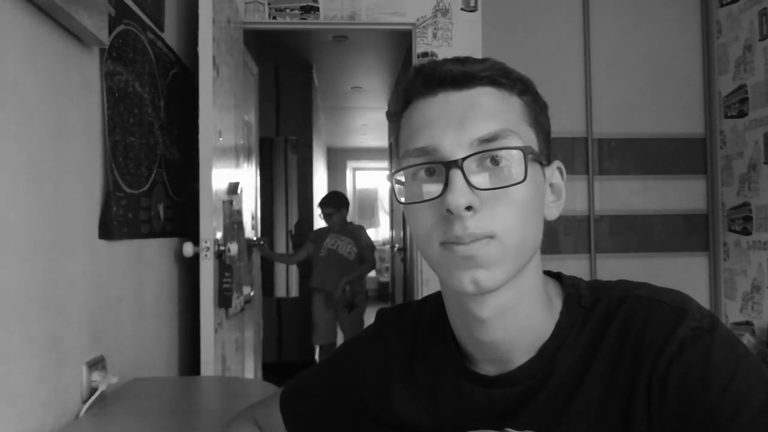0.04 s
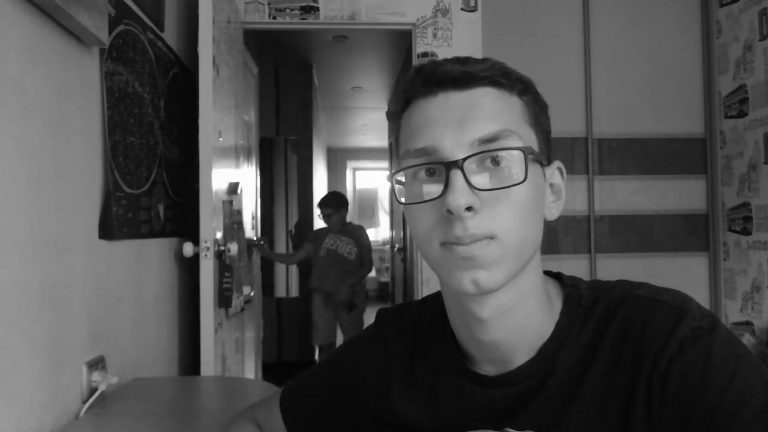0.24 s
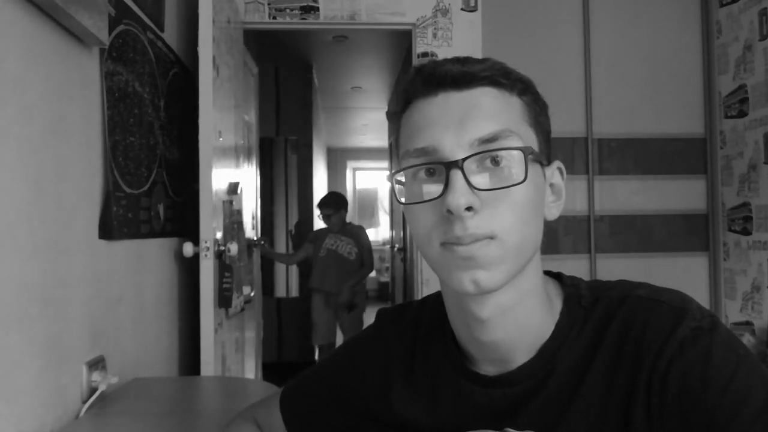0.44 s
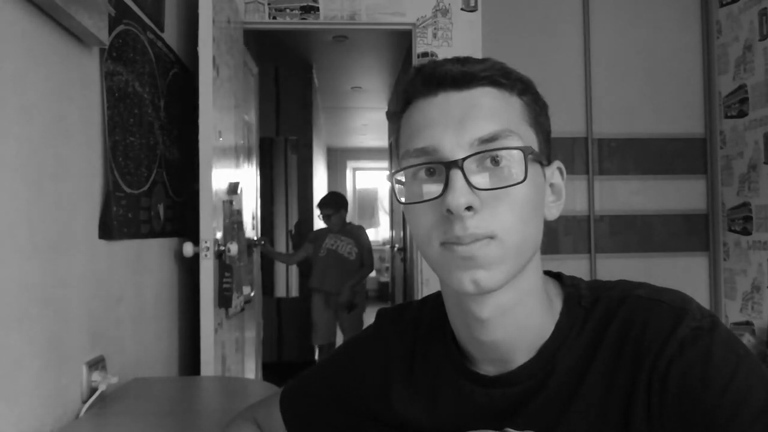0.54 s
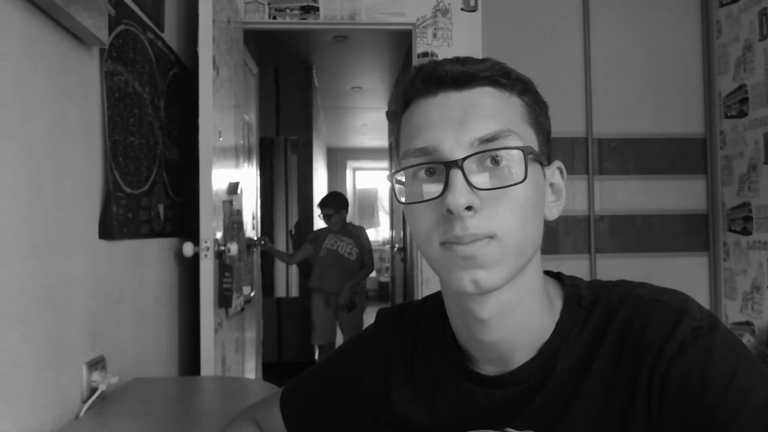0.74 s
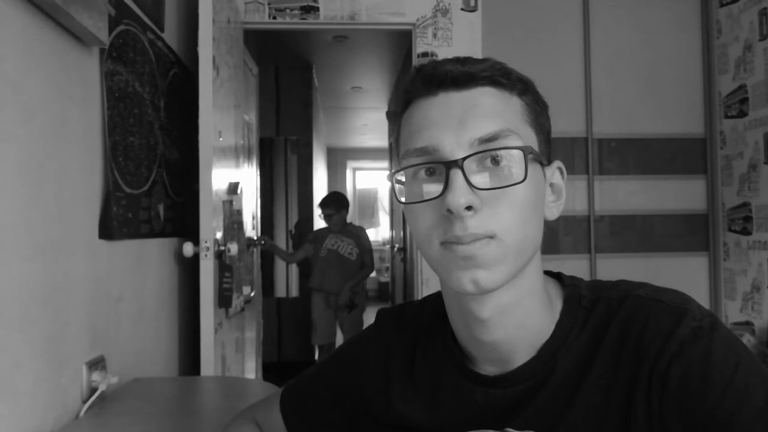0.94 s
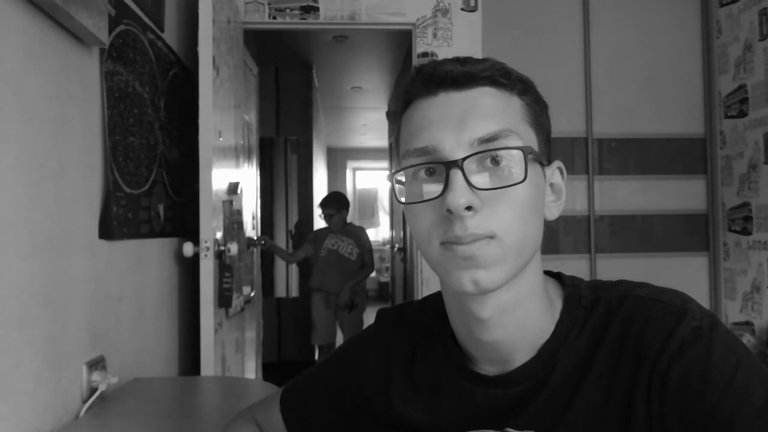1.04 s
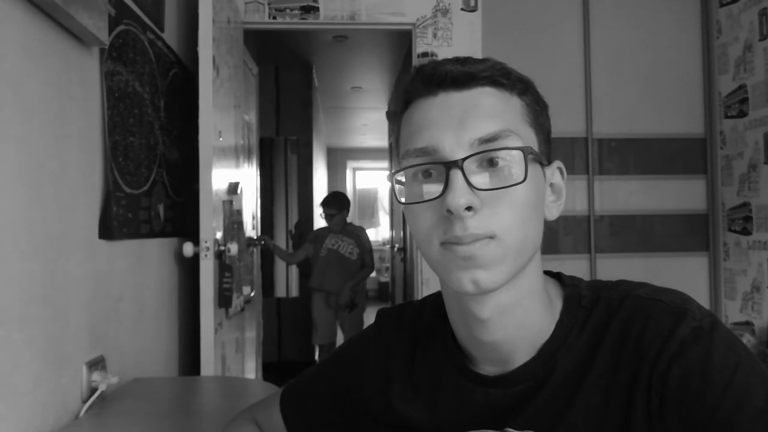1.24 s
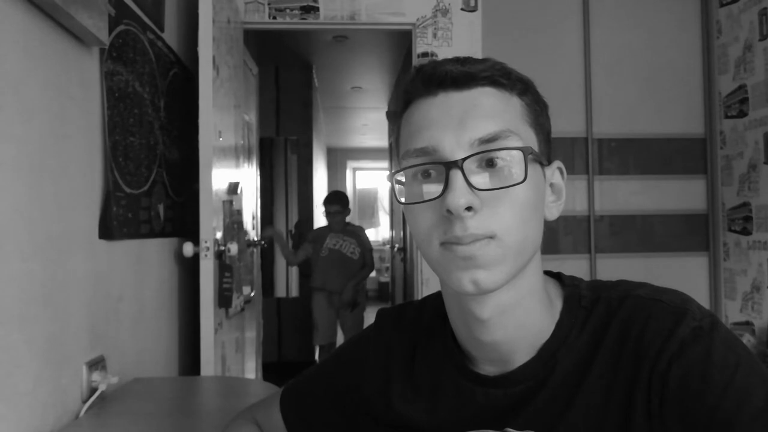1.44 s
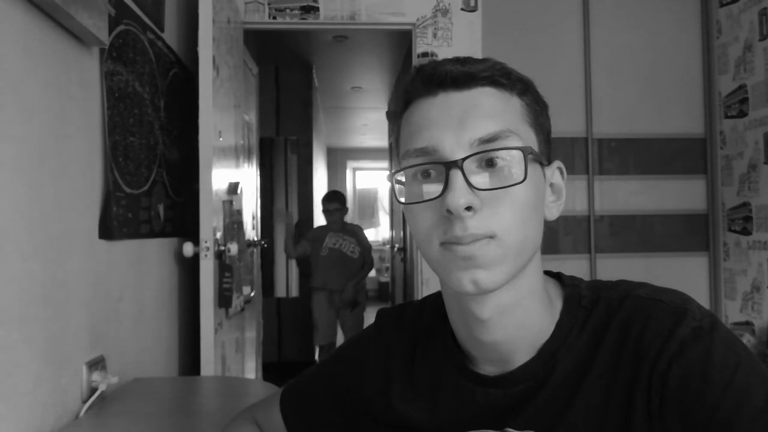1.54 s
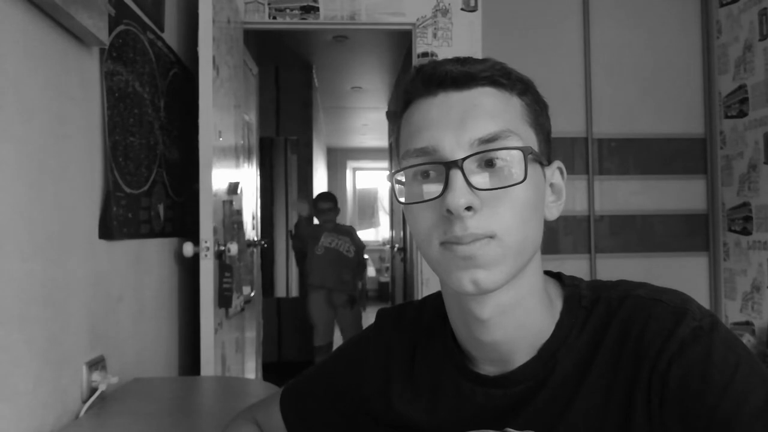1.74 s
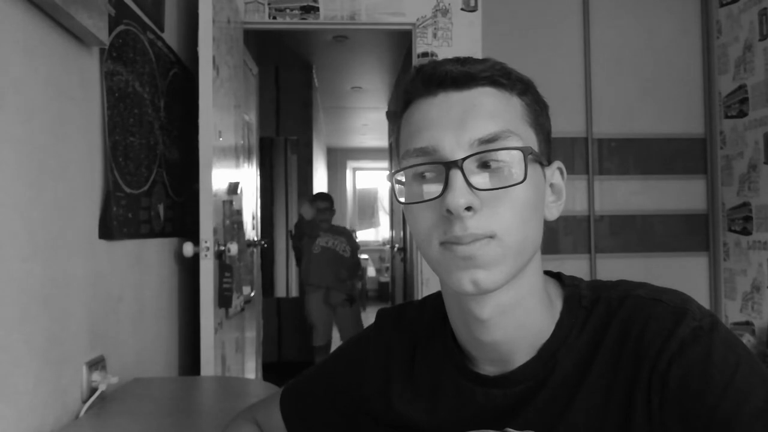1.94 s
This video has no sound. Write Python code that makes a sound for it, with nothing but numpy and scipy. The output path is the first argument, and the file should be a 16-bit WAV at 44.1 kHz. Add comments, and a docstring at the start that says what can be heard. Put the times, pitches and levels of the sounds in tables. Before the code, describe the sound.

In a small room, an inner door swings with a short, high squeak and stops with a deep, rattling thud. A few faint handling taps and scuffs come afterwards, over a steady low electrical hum.

```python
"""A dry hinge rasps, then locks into a rising squeal as its stick-slip friction turns regular.
The inner door meets its stop with a thud and a rattle, rebounds softly and sets the air of the
rooms swaying; each impact excites damped modes of door and room. A few faint scuffs and taps
of handling follow, in a small room with a low mains hum."""
import sys
import numpy as np
from scipy import signal
from scipy.fft import rfft, irfft
from scipy.io import wavfile

SR = 44100
rng = np.random.default_rng(int(sys.argv[2]) if len(sys.argv) > 2 else 0)


def wrap_up_sound(samples):
    """Save the sound to the file named by the first command line argument, as 16-bit audio."""
    columns = np.atleast_2d(samples).T
    # keep every value between -1 and 1, then stretch to whole-number steps
    tamed = np.clip(columns, -1, 1)
    steps = np.round(tamed * 32767).astype(np.int16)
    wavfile.write(sys.argv[1], SR, steps)


N = 88200
T = np.arange(N) / SR

# impacts of the door on its stop (time [s], boom [dB], knock [dB], rattle [dB])
DOOR_IMPACTS = [(0.212, -43, -37, -75), (0.2196, -32.5, -35, -44.5), (0.239, -30.5, -39.5, -49),
                (.279, -39, -48.5, -64.5), (.322, -37.5, -59, -83), (.352, -40, -60, -89.5)]


def undb(db):
    """Amplitude ratio of a level in decibels."""
    return 10 ** (np.asarray(db) / 20)


def unit(x):
    """Normalisation to rms 1."""
    return x / np.sqrt(np.mean(x ** 2))


def noise(spectrum):
    """Filtered white noise of rms 1: follows (frequency [Hz], level [dB]) from 15 Hz to 8 kHz."""
    hz, db = np.array(spectrum, float).T
    f = np.arange(N // 2 + 1) * SR / N + 1e-3
    gain = undb(np.interp(np.log(f), np.log(hz), db)) / (1 + (15 / f) ** 4) * (f < 8000)
    return unit(irfft(rfft(rng.standard_normal(N)) * gain, N))


def wander(rate_hz, size=N):
    """Low-pass random fluctuation of rms 1."""
    f = np.arange(size // 2 + 1) * SR / size
    return unit(irfft(rfft(rng.standard_normal(size)) * np.exp(-(f / rate_hz) ** 2), size))


def strike(start, attack, t60):
    """Envelope of a damped vibration: linear rise, then exponential decay by 60 dB in t60 seconds."""
    age = T - start
    return np.clip(age / attack, 0, 1) * np.exp(-np.log(1000) * np.maximum(age - attack, 0) / t60)


def reverberate(x, wet_db):
    """Reverberation: a small room's diffuse reflections share the power with the direct sound."""
    tail = rng.standard_normal(N) * strike(0.0071, 0.0031, t60=.38)
    wet = signal.fftconvolve(x, tail / np.sqrt(np.sum(tail ** 2)))[:len(x)]
    return (x + undb(wet_db) * wet) / np.sqrt(1 + undb(wet_db) ** 2)


def background():
    """Line spectrum over broadband noise: mains and appliance hum wavers above steady room tone."""
    # room tone (frequency [Hz], relative level [dB])
    room_spectrum = [(20, 4), (50, 2.5), (85, -7), (150, -6.5), (260, -8.5), (430, -17), (750, -20),
                     (1050, -23), (1420, -29), (2000, -29), (3200, -31), (3850, -40), (4800, -35),
                     (5700, -32), (7300, -42)]
    # hum partials (frequency [Hz], rms level [dB], waver [dB])
    hum_partials = [(59.5, -63.5, 1), (119.5, -61, 1.5), (167, -72, 2), (249, -73, 2), (758, -85, 1),
                    (1008, -84, 1), (2019, -89, 1)]
    waver_hz, drift_rad = 2.4, .6
    out = undb(-60) * noise(room_spectrum)
    for hz, db, waver_db in hum_partials:
        phase = 2 * np.pi * (hz * T + rng.random()) + drift_rad * wander(waver_hz)
        out += np.sqrt(2) * undb(db + waver_db * wander(waver_hz)) * np.sin(phase)
    return out


def handling():
    """Transient excitation: soft scuffs and taps, each a decaying noise burst with a woody resonance."""
    # contacts (time [s], attack [s], low [dB], middle [dB], high [dB], ring frequency [Hz])
    taps = [(.655, 0.037, -67, -65.5, -96, 877), (0.908, 0.026, -65.5, -94, -79, 688),
            (0.936, 0.015, -86, -95, -73, 1146), (1.234, 0.011, -61, -70, -60, 1140),
            (1.405, 0.022, -73, -75, -77.5, 1160), (1.469, 0.02, -78, -83, -76.5, 1130),
            (1.801, 0.012, -74, -73.5, -71.5, 1140)]
    # their three noise bands (frequency [Hz], relative level [dB])
    low_band = [(200, -7), (480, -8), (680, 0), (1150, -10.5), (1400, -12), (1900, -17.5), (3000, -32)]
    middle_band = [(700, 1), (1600, 9), (2900, 5), (4000, -16), (7000, -38)]
    high_band = [(2500, -13.5), (4500, -10), (5300, -1), (6000, 1), (6600, -3.5), (7300, -17)]
    scatter_rad = 1.6
    out = np.zeros(N)
    for start, attack, low_db, middle_db, high_db, ring_hz in taps:
        ring = np.sqrt(2) * np.sin(2 * np.pi * ring_hz * T + scatter_rad * wander(rate_hz=43))
        body = undb(low_db) * (noise(low_band) + undb(-3) * ring)
        scrape = undb(middle_db) * noise(middle_band) + undb(high_db) * noise(high_band)
        out += (body + scrape) * strike(start, attack, t60=0.37)
    return out


def air_sway():
    """Damped oscillation: pushed by the stopping door, the air rocks infrasonically between the rooms."""
    push_s, push_hz = DOOR_IMPACTS[0][0], 23
    sway_s, sway_hz = .268, 10.4
    push = np.sin(2 * np.pi * push_hz * (T - push_s)) * strike(push_s, .002, t60=0.14)
    sway = np.sin(2 * np.pi * sway_hz * (T - sway_s)) * strike(sway_s, 0.016, t60=1.8)
    return undb(-23.5) * push + undb(-31) * sway


def hinge():
    """Stick-slip friction of the hinge pin: irregular slips rasp, periodic ones squeal."""
    # pitch of the squeal (time [s], slip rate [Hz])
    slip_rates = [(0, 1065), (.021, 1073), (.027, 1149), (.048, 1152), (.064, 1157), (.076, 1184),
                  (.132, 1179), (.141, 1210), (.168, 1203), (.184, 1229), (.203, 1196), (.22, 1191)]
    # friction drive (time [s], level [dB], roughness [0-1], spectral tilt [dB/octave])
    friction = [(0, -45, 0.98, -1.5), (.025, -46.5, 0.79, -0.5), (.045, -48, 0.78, 1.5),
                (0.069, -47.5, 0.1, 0.5), (.11, -48, 0.09, 0.5), (0.154, -47.5, 0.11, 0),
                (.185, -49, 0, -7), (.21, -48.5, 0.15, -2.5)]
    # slip spectrum (harmonic number, relative level [dB])
    harmonics = [(1, -6.5), (2, -2.5), (3, -2), (4, -3), (5, 3), (6, -6.5)]
    # hinge resonances that the harmonics sweep through (frequency [Hz], width [Hz], lift [dB])
    resonances = [(2273, 170, 5), (4270, 260, 1.5), (4660, 130, 8.5), (6070, 94, 2)]
    stop_s, release_s = .218, .006
    lead = N // 10  # the hinge is already turning at time zero
    t = np.arange(-lead, N) / SR
    times, *columns = np.array(friction).T
    level_db, roughness, tilt = (np.interp(t, times, column) for column in columns)
    pitch = np.interp(t, *np.array(slip_rates).T)
    jitter = (.004 + .016 * roughness) * wander(rate_hz=400, size=len(t))
    phase = 2 * np.pi * np.cumsum(pitch * (1 + jitter)) / SR
    tone = power = 0
    for k, db in harmonics:
        gain = undb(db + tilt * np.log2(k))
        lift_db = sum(lift / (1 + (2 * (k * pitch - hz) / width) ** 2) for hz, width, lift in resonances)
        tone += gain * undb(lift_db) * np.sin(k * phase + rng.uniform(0, 2 * np.pi))
        power += gain ** 2 / 2
    depth = 1.3 * roughness
    chatter = (1 + depth * np.tanh(wander(rate_hz=600, size=len(t)))) / np.sqrt(1 + depth ** 2 / 2)
    moving = np.clip(1 - (t - stop_s) / release_s, 0, 1)
    squeal = tone / np.sqrt(power) * chatter * moving * undb(level_db)
    return reverberate(squeal, wet_db=-5)[lead:]


def door_thud():
    """Impact excitation: each blow cracks, knocks the panel and rattles its fittings; low modes boom on."""
    # modes of door and room (frequency [Hz], level relative to the boom [dB], t60 [s], build-up [s])
    door_modes = [(46.3, -13, 1.0, 0.045), (66.1, 5, 0.16, .03), (91.7, -7, 0.61, 0.038),
                  (146.85, -0.5, 0.23, 0.016), (162.45, -3, 0.32, 0.01), (293.3, -12, 0.22, 0.0053),
                  (390, -12, 0.12, .005), (542.7, -27.5, 0.17, 0.017)]
    # noise spectra of an impact (frequency [Hz], relative level [dB])
    boom_spectrum = [(25, -8), (50, 0.5), (90, 1.5), (120, -6), (160, -3.5), (200, -14.5), (400, -31.5),
                     (900, -65.5)]
    knock_spectrum = [(80, -19.5), (160, 3), (310, 0.5), (410, 0), (500, -7), (720, -9), (1000, -20),
                      (2000, -50)]
    rattle_spectrum = [(200, 5), (600, -8), (1000, 2.5), (1600, -4.5), (2500, 0), (3900, -9), (5600, -1.5),
                       (7300, -20)]
    attack_s = .007
    out = np.zeros(N)
    for start, boom_db, knock_db, rattle_db in DOOR_IMPACTS:
        modes = sum(undb(db) * np.sin(2 * np.pi * hz * (T - start)) * strike(start, build, t60)
                    for hz, db, t60, build in door_modes)
        rumble = undb(-7) * noise(boom_spectrum) * strike(start, 0.011, t60=.5)
        knock = noise(knock_spectrum) * strike(start, attack_s, t60=.26)
        crack_envelope = undb(2) * strike(start, attack_s / 2, t60=0.048)
        rattle = noise(rattle_spectrum) * (strike(start, attack_s, t60=.37) + crack_envelope)
        out += undb(boom_db) * (modes + rumble) + undb(knock_db) * knock + undb(rattle_db) * rattle
    return out


def scene():
    """Superposition of all sources at one point."""
    return (hinge() + door_thud() + air_sway() + handling() + background())[None]


def record(dry):
    """Band limiting: an elliptic low-pass filter cuts the treble steeply."""
    cutoff_hz = 7350
    return signal.sosfilt(signal.ellip(8, .2, 70, cutoff_hz, fs=SR, output="sos"), dry)


dry = scene()
out = record(dry)
wrap_up_sound(out)
```